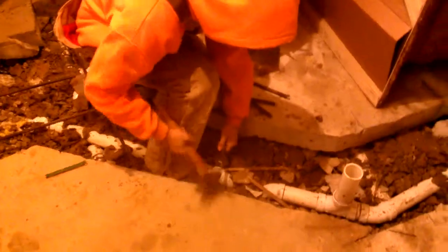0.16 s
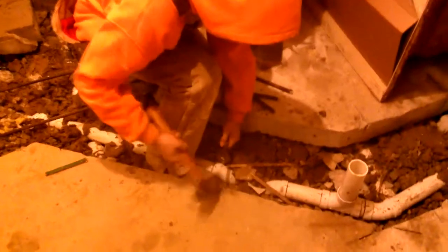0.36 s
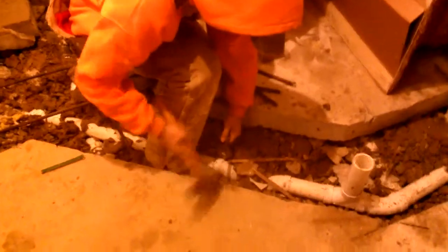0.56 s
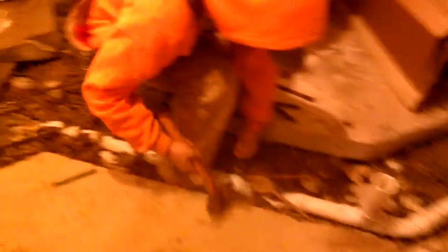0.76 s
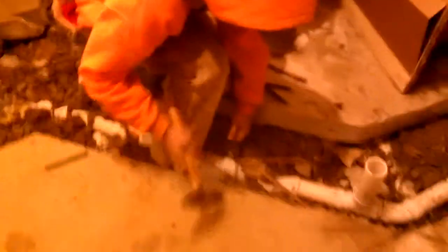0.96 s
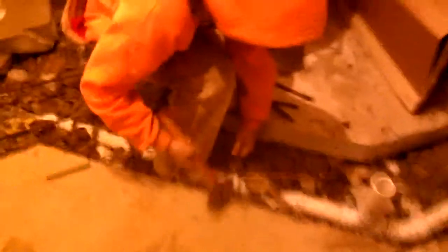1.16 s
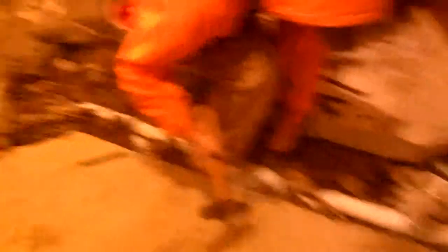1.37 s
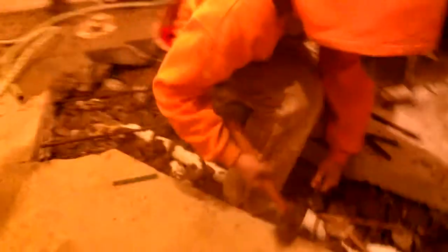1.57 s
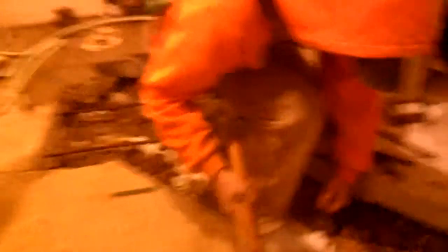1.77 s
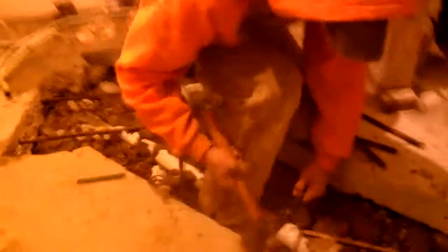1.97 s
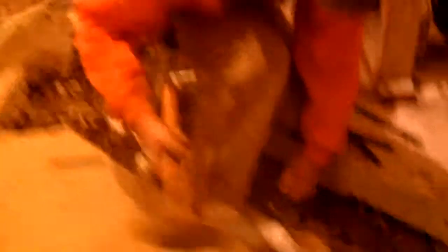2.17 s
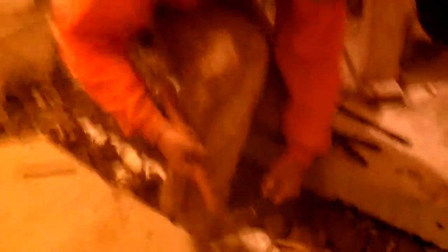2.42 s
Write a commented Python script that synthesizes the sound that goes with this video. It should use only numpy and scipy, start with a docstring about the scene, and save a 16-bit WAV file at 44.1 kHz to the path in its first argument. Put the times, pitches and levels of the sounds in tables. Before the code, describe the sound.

Close, loud, bright hammer blows land on steel about every half second in a bare, hard room. Gritty scuffing follows the first hit, and a hard stony knock sounds after the last; faint noise lies underneath.

```python
"""Hammering rods into concrete

A club hammer drives steel rods into the edge of a concrete slab in a bare room. Each blow is a noise crack
and damped sines for rod, hammer head and slab, answered by decaying noise as the room. Between blows
a boot scrapes over grit (grainy shaped noise) and stones knock (rattling short sines).
An expander turns the quiet passages down and shortens the tails."""
import sys
import numpy as np
from scipy import signal
from scipy.io import wavfile
from scipy.ndimage import uniform_filter1d

SR = 44100
rng = np.random.default_rng(int(sys.argv[2]) if len(sys.argv) > 2 else 0)


def wav_record(signal):
    """Record a signal, one row per channel, as 16-bit PCM in the file named by sys.argv[1]."""
    frames = np.transpose(np.atleast_2d(signal))
    bounded = np.clip(frames, -1, 1)
    # unit amplitude maps onto the largest positive 16-bit level
    quanta = np.round(bounded * 32767).astype(np.int16)
    wavfile.write(sys.argv[1], SR, quanta)


def convert_level_to_amplitude(level_db):
    """Map a level in decibels to its linear amplitude factor."""
    exponent = np.asarray(level_db, float) / 20
    return 10 ** exponent


N = 108045
EDGES_HZ = 30 * 2 ** np.arange(0, 9.1, .375)
CENTRES_HZ = np.sqrt(EDGES_HZ[1:] * EDGES_HZ[:-1])


def rms_one(x):
    """Scales a sound to an rms of 1."""
    return x / np.sqrt(np.mean(x ** 2) + 1e-20)


def at_hz(points, hz):
    """Reads a curve of (Hz, value) points along a log frequency axis."""
    curve_hz, values = np.transpose(points)
    return np.interp(np.log(hz), np.log(curve_hz), values)


def pan(left_over_right_db):
    """Left and right gains that differ by the given dB."""
    return convert_level_to_amplitude(np.multiply.outer([.5, -.5], np.atleast_1d(left_over_right_db)))


def ring(clicks, hz, t60_s):
    """A damped resonance: a unit click sets a sine of height about 1 ringing."""
    r = convert_level_to_amplitude(-60 / (max(t60_s, 1e-3) * SR))
    w = 2 * np.pi * hz / SR
    return signal.lfilter([0, np.sin(w)], [1, -2 * r * np.cos(w), r * r], clicks + 1e-18)


def add(out, sound, start_s):
    """Mixes a sound in at start_s; what lies before 0 s is lost."""
    i = int(round(start_s * SR))
    part = sound[:, max(-i, 0):N - i]
    out[:, max(i, 0):max(i, 0) + part.shape[1]] += part


# Likeness of left and right. Each row: frequency in Hz, raw likeness (no unit, scaled in bands).
RAW_LIKENESS = [(60, 0.97), (180, 1), (530, 0.87), (1590, 0.13), (4730, 0.36), (14100, -0.19)]
# Lean of the microphones. Each row: frequency in Hz, left over right in dB.
LEAN_DB = [(100, 3.5), (500, 4.5), (1000, 2.5), (4000, -2), (8000, 3.5), (13000, -9)]


def bands(white):
    """Splits two draws of stereo noise into bands, each as alike left and right as the microphones hear it."""
    out = []
    for k, hz in enumerate(CENTRES_HZ):
        band = signal.butter(2, EDGES_HZ[k:k + 2], "band", fs=SR, output="sos")
        mid, side = signal.sosfilt(band, white[k % 2])
        alike = np.clip(at_hz(RAW_LIKENESS, hz) * 1.405 - .4, -1, 1)
        stereo = np.sqrt(1 + alike) * mid + np.sqrt(1 - alike) * side * [[1], [-1]]
        out.append(pan(at_hz(LEAN_DB, hz)) * stereo)
    return np.array(out)


def colour(noise, spectrum):
    """Weights the noise bands by a spectrum in dB and sums them to an rms of 1."""
    return rms_one(np.tensordot(convert_level_to_amplitude(at_hz(spectrum, CENTRES_HZ)), noise, axes=1))


# Background spectrum. Each row: frequency in Hz, relative density in dB.
FLOOR_SPECTRUM_DB = [(15, -44), (25, -20), (166, -17.5), (260, -9), (331, -14.5), (506, -18), (4870, -26.5),
                     (9470, -29), (13400, -30.5), (14500, -32.5)]


def background(noise):
    """Steady noise, strongest in the low mids."""
    floor_rms_db = -44
    return convert_level_to_amplitude(floor_rms_db) * colour(noise[:, :, ::-1], FLOOR_SPECTRUM_DB)


# Decay of the room. Each row: frequency in Hz, t60 in s.
ROOM_T60_S = [(60, 1.03), (160, 0.78), (420, 0.92), (1100, 0.49), (2900, 0.51), (5000, 0.48), (8000, 0.34),
              (13000, 0.24)]
# Build-up of the room. Each row: frequency in Hz, time constant in s.
ROOM_BUILD_S = [(50, 0.16), (120, 0.066), (300, 0.004), (1000, 0.0082), (5000, .0015)]


def room(sound, noise):
    """The room's answer: dense reflections that build up and die band by band."""
    early_db, early_t60_s = -9.5, 0.05  # the nearest walls answer first and loudest
    t = np.arange(noise.shape[2]) / SR
    decay = convert_level_to_amplitude(-60 * t / at_hz(ROOM_T60_S, CENTRES_HZ)[:, None])
    build = -np.expm1(-t / at_hz(ROOM_BUILD_S, CENTRES_HZ)[:, None])
    shape = decay * build * (1 + convert_level_to_amplitude(early_db - 60 * t / early_t60_s))
    response = 0.15 * np.einsum("bt,bct->ct", shape, noise)
    return signal.fftconvolve(response, sound[None], axes=1)


# Hard boot stroke. Each row: time in s, level in dB, left over right in dB.
HARD_STROKE = [(.435, -48, -11), (.47, -33.5, -17.5), (.5, -27.5, -16.5), (.55, -23.5, -11.5),
               (.575, -25.5, -11.5), (.6, -25.5, -9.5), (.64, -30, -21)]
# Light boot shuffles, one list each. Each row: time in s, level in dB, left over right in dB.
SHUFFLES = [
    [(0.99, -83, -9.5), (1.016, -71, -5.5), (1.028, -45.5, -12.5), (1.042, -68.5, -6.5), (1.07, -39, 0)],
    [(1.31, -37, -1.5), (1.334, -46.5, -15.5), (1.416, -39, -7), (1.47, -44, -14), (1.484, -40.5, -14.5),
     (1.51, -34, -3)],
    [(1.855, -45, -11), (1.877, -34, -1), (1.907, -37, -3.5), (1.917, -39.5, -1), (1.965, -39, -2),
     (1.98, -46, -3)],
    [(2.2, -63, -1.5), (2.262, -72.5, -0.5), (2.326, -57.5, -21), (2.344, -45.5, -8.5), (2.398, -49, 3.5),
     (2.45, -38.5, 1)],
]
# Spectrum of the hard stroke. Each row: frequency in Hz, relative density in dB.
HARD_SPECTRUM_DB = [(120, -22), (200, -32), (266, -56), (297, -38), (566, -2), (809, -6.5), (1950, -1),
                    (4950, -6.5), (6240, -24), (12800, -20.5), (14500, -41)]
# Spectrum of the light shuffles. Each row: frequency in Hz, relative density in dB.
SHUFFLE_SPECTRUM_DB = [(120, -36.5), (200, -23), (753, -17), (968, -14.5), (1600, -2), (3280, -10),
                       (5220, -0.5), (6710, -17), (13300, -7.5), (14500, -56)]


def scrapes():
    """Grit crushed under a sole: dense uneven grains in a hiss; the hard stroke is duller than the light ones."""
    grains_per_s, grain_spread_db, grain_share = 1800, 3.3, .45
    sizes = convert_level_to_amplitude(grain_spread_db * np.minimum(rng.exponential(1, N), 5))
    grains = sizes * (rng.random(N) < grains_per_s / SR)
    grit = rms_one(uniform_filter1d(grains, size=12))
    roughness = 1 - grain_share + grain_share * grit
    noise = bands(rng.standard_normal((2, 2, N)) * roughness)
    t = np.arange(N) / SR
    out = np.zeros((2, N))
    strokes = [(HARD_STROKE, HARD_SPECTRUM_DB)] + [(rows, SHUFFLE_SPECTRUM_DB) for rows in SHUFFLES]
    for rows, spectrum in strokes:
        s, db, pan_db = np.transpose(rows)
        gain = np.interp(t, np.r_[s[0] - .01, s, s[-1] + .01], np.r_[0, convert_level_to_amplitude(db), 0])
        out += gain * pan(np.interp(t, s, pan_db)) * colour(noise, spectrum)
    return out


# Stones. Each row: start in s, level in dB, pitch in Hz, t60 in s, rattle t60 in s, room level in dB,
# left over right in dB.
STONES = [(1.742, -49.5, 2220, .004, 0.0035, -20, -7.5), (1.758, -30, 2200, 0.0038, 0.028, -12.5, -8.5),
          (1.9, -35, 1694, .03, 0.0034, -10, -12), (2.053, -33.5, 2300, 0.0015, 0.002, -10.5, 56),
          (2.0872, -3, 860, 0.0076, 0.00087, -36, -10), (2.345, -38.5, 970, 0.014, 0.013, -17, -13),
          (2.43, -38, 2210, 0.0054, 0.0208, -1.5, -6.5)]


def knocks(noise):
    """Stones and grit knock dully on two damped modes and rattle for a moment."""
    out = np.zeros((2, N))
    t = np.arange(SR // 10) / SR
    for k, (s, db, hz, t60_s, rattle_s, room_db, pan_db) in enumerate(STONES):
        rattle = 0.23 * rng.standard_normal(len(t)) * convert_level_to_amplitude(-60 * t / rattle_s)
        touches = (t == 0) + rattle
        modes = ring(touches, hz, t60_s) - .5 * ring(touches, 3.4 * hz, t60_s * 0.38)
        high_pass = signal.butter(2, .6 * hz, "high", fs=SR, output="sos")
        hit = signal.sosfilt(high_pass, convert_level_to_amplitude(db) * modes)
        add(out, pan(pan_db) * hit, s)
        echo = room(hit, noise[:, :, k * 7000:k * 7000 + SR // 2])
        add(out, convert_level_to_amplitude(room_db) * pan(pan_db) * echo, s)
    return out


# Blows; one falls before the start, one only grazes. Each row: start in s, level in dB, rod pitch in Hz,
# then offsets in dB for rod's main mode, head's lowest mode, slab thud, boom and treble,
# then left over right in dB.
BLOW_ROWS = [(-.225, -12, 4910, 7, -3, 10.5, -5.5, -19, -3),
             (.2104, -11.5, 4750, 6.5, -2, 5.5, -15, 2., -4.), (.6405, -10.5, 4510, 3, 0., 5, -2, 3, -3.5),
             (1.0800, -10, 4450, 3.5, 1, 4, 0, 2, -2.5), (1.518, -33, 4790, 2.5, -1.5, 18.5, -3, 7.5, -5.5),
             (1.5357, -10.5, 5220, 4.5, -0.5, 7, 4.5, 2.5, -4.5),
             (1.9922, -12.5, 4540, 5, 2, 6, 7.5, 3.5, -4.5)]
# Gripped rod and contact, heavily damped. Each row: multiple of rod pitch, level in dB, t60 in s.
ROD_MODES = [(1.001, -1.5, 0.0051), (.68, -7.5, 0.0051), (.84, -1, 0.0045), (.92, -2, 0.0088)]
# Hammer head. Each row: frequency in Hz, level in dB, t60 in s.
HEAD_MODES = [(5480, 0.5, 0.004), (6100, -19.5, 0.013), (7150, -14.5, 0.0013), (8180, -6, 0.0046),
              (9830, -16, 0.0074), (11020, -11, 0.0013), (12180, -6.5, 0.0056), (13500, -17, 0.033)]
# Slab and rubble. Each row: frequency in Hz, level in dB, t60 in s.
SLAB_MODES = [(165.7, -30, 0.051), (247.7, -30.5, 0.036), (352, -35, 0.056), (555, -25, 0.017),
              (708, -22, 0.014), (1020, -18, 0.0053), (1450, -21.5, 0.0074), (2010, -16, 0.0037),
              (2730, -17.5, 0.0049)]
# Deep boom of the building, heard only through the room. Each row: frequency in Hz, level in dB, t60 in s.
BOOM_MODES = [(62.4, -33, 0.12), (98.2, -27.5, 0.19)]
# Faces pinging on contact, heard only directly. Each row: frequency in Hz, level in dB, t60 in s.
PING_MODES = [(5750, 5, .012), (12600, 1, .01)]


def blow_modes(hz, rod_db, head_db, thud_db, treble_db):
    """The modes one blow excites in rod, head and slab, in order of frequency."""
    bell = (7991, -33, 0.39)  # the one lasting mode of the head: Hz, dB, t60 s
    modes = [(f, db + thud_db, t60_s) for f, db, t60_s in SLAB_MODES]
    for j, (multiple, db, t60_s) in enumerate(ROD_MODES):
        modes.append((multiple * hz, db + (0 if j else rod_db), t60_s))
    for j, (f, db, t60_s) in enumerate(list(HEAD_MODES) + [bell]):
        modes.append((f, db + (treble_db if j else head_db), t60_s))
    return sorted(modes)


def blows(noise):
    """The face lands with a crack and rings rod, head and slab; reflections vary from blow to blow."""
    spread_db, direct_db, contact_s, left_lag_s = 1.3, 10, 0.00037, .0001
    crack_db, crack_t60_s, ping_lag_samples = 3.5, 0.0037, 12
    out = np.zeros((2, N))
    t = np.arange(SR // 2) / SR
    click = 1. * (t == 0)
    late_click = np.roll(click, shift=ping_lag_samples)
    for k, (s, db, hz, rod_db, head_db, thud_db, boom_db, treble_db, pan_db) in enumerate(BLOW_ROWS):
        steel, slab = np.zeros(len(t)), np.zeros(len(t))
        for j, (f, d, t60_s) in enumerate(blow_modes(hz, rod_db, head_db, thud_db, treble_db)):
            level = convert_level_to_amplitude(db + d + spread_db * rng.standard_normal())
            body = steel if f > SLAB_MODES[-1][0] else slab
            body += (-1) ** j * level * ring(click, f, t60_s)
        hit = steel + slab
        boom = sum(convert_level_to_amplitude(db + d + boom_db) * ring(click, f, t60_s) for f, d, t60_s in BOOM_MODES)
        bright_noise = np.diff(rng.standard_normal((2, len(t) + 1)))
        crack = convert_level_to_amplitude(db + crack_db + treble_db - 60 * t / crack_t60_s) * bright_noise
        ping = sum(convert_level_to_amplitude(db + d) * ring(late_click, f, t60_s) for f, d, t60_s in PING_MODES)
        lagged = np.interp(t - left_lag_s, t, hit)
        direct = convert_level_to_amplitude(direct_db) * np.array([lagged, hit]) + crack + ping
        onset = -np.expm1(-t / contact_s)
        add(out, pan(pan_db) * direct * onset, s)
        i = k * 9000  # each blow takes its own stretch of reflections
        echo = room(steel, noise[:, :, i:i + SR])
        echo = echo + room(slab + boom, noise[:, :, i + 4000:i + 4000 + SR])
        add(out, pan(pan_db) * echo, s)
    return out


def scene():
    """Background, boot, stones and hammer together."""
    noise = bands(rng.standard_normal((2, 2, N)))
    return background(noise) + scrapes() + knocks(noise) + blows(noise)


def band_limit(x):
    """A steep low-pass at the top of the band."""
    return signal.sosfilt(signal.butter(12, 14700, fs=SR, output="sos"), x)


def record(dry):
    """The microphones lose the deepest bass; an expander lowers quiet passages, peaks clip, the top is cut."""
    mic_low_hz, mic_top_hz = 49.6, 14070
    threshold_db, slope_db_per_db, max_cut_db, smooth_s = -31, 1.88, 15.5, .013
    dry = signal.sosfilt(signal.butter(3, mic_low_hz, "high", fs=SR, output="sos"), dry)
    square = np.mean(dry ** 2, axis=0)
    r = np.exp(-1 / (smooth_s * SR))
    power = signal.lfilter([1 - r], [1, -r], square, zi=[np.mean(square[:400])])[0]
    power = np.maximum(power, uniform_filter1d(square, size=256))  # opens just ahead of a blow
    level_db = 10 * np.log10(power + 1e-12)
    gain_db = np.clip(slope_db_per_db * (level_db - threshold_db), -max_cut_db, 0)
    clipped = np.clip(dry * convert_level_to_amplitude(gain_db), -1, 1)
    top_cut = signal.cheby2(6, 24, mic_top_hz, fs=SR, output="sos")
    mix = np.clip(signal.sosfilt(top_cut, clipped), -1, 1)
    return band_limit(mix)


dry = scene()
out = record(dry)
wav_record(out)
```